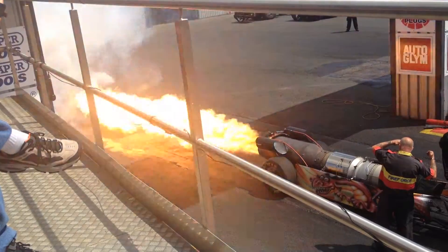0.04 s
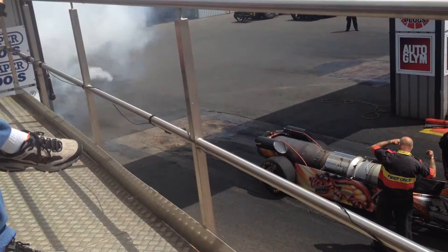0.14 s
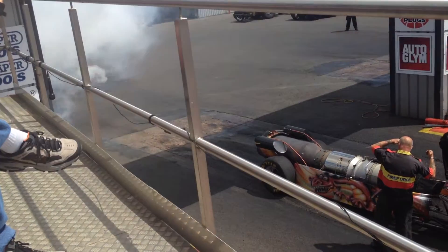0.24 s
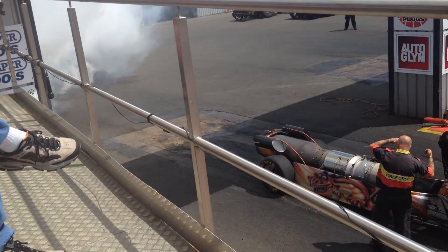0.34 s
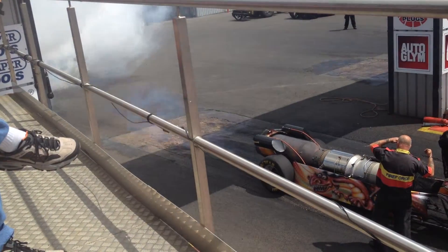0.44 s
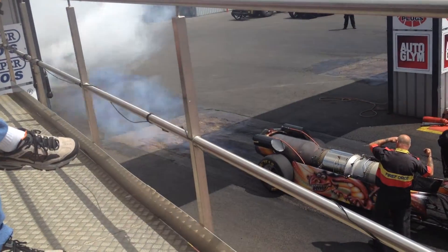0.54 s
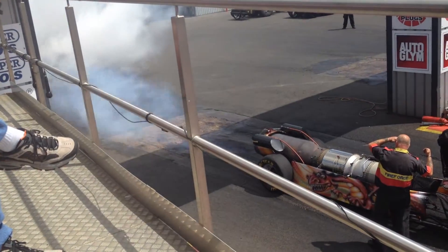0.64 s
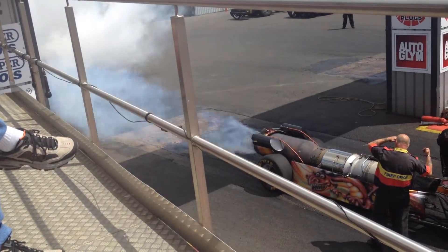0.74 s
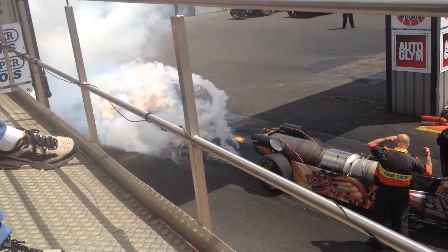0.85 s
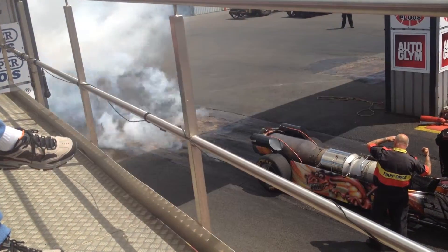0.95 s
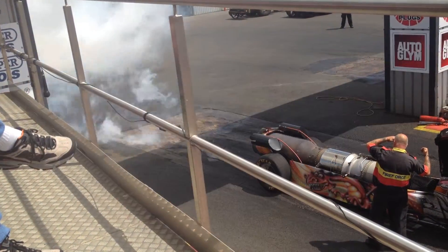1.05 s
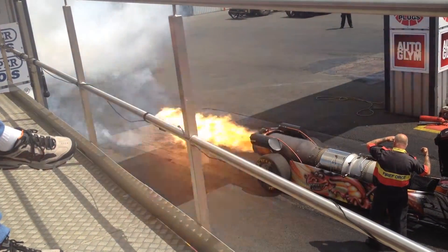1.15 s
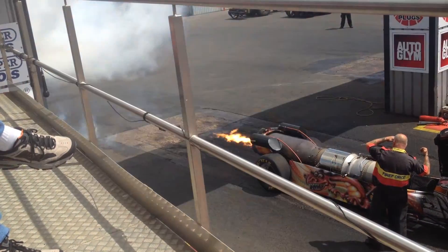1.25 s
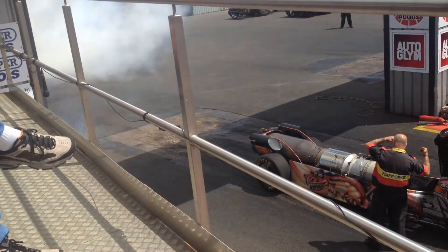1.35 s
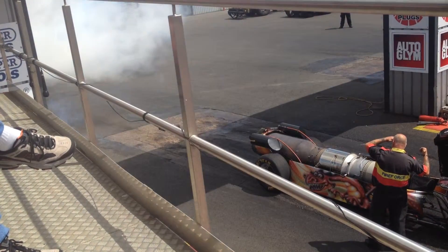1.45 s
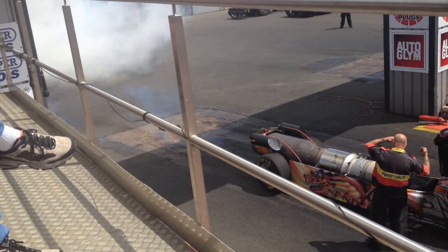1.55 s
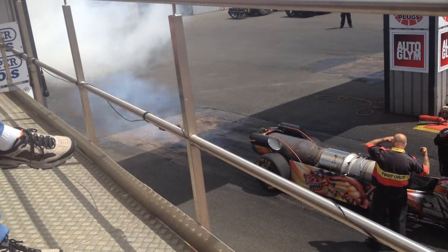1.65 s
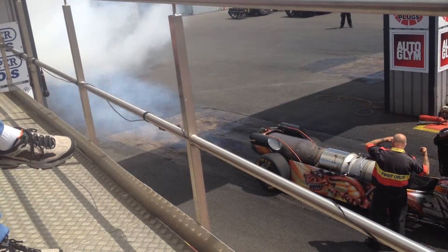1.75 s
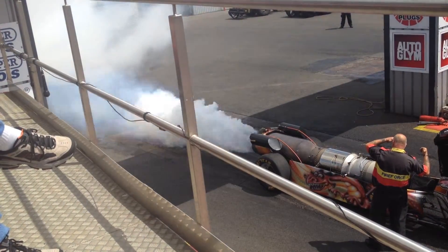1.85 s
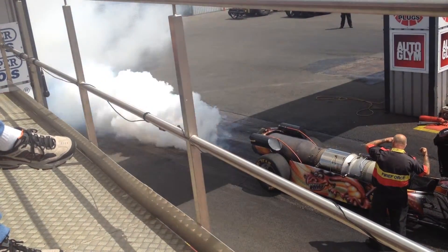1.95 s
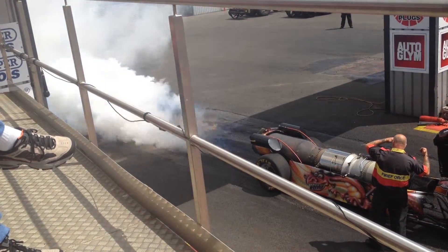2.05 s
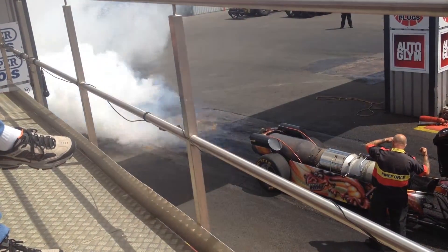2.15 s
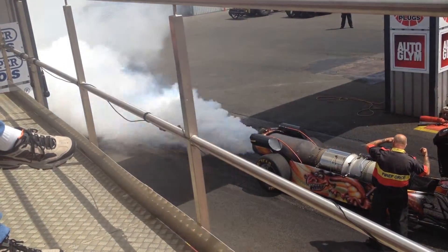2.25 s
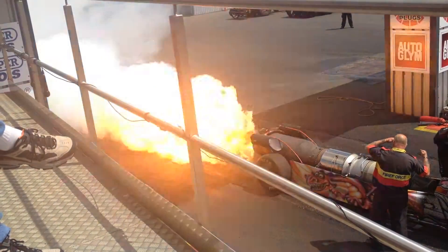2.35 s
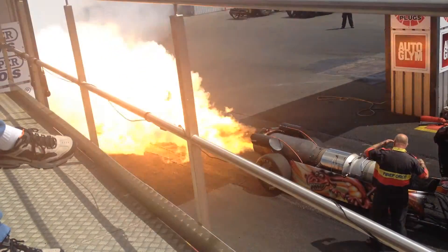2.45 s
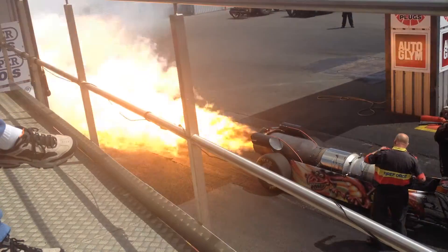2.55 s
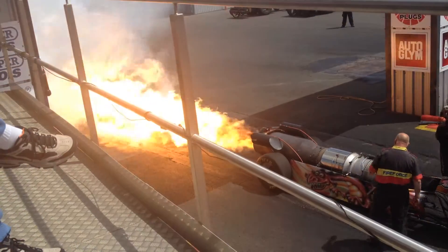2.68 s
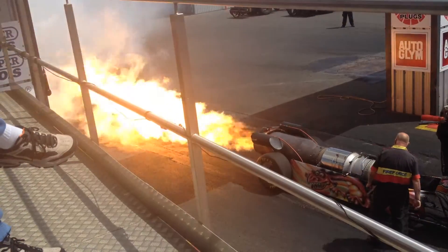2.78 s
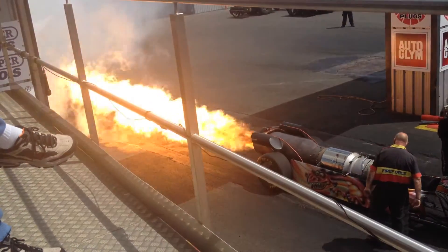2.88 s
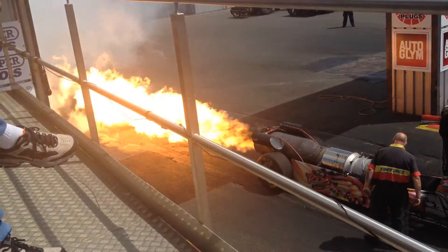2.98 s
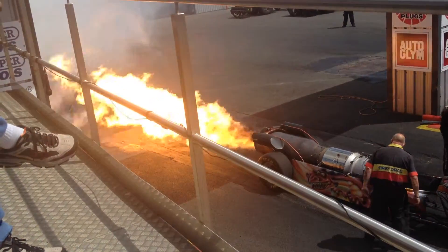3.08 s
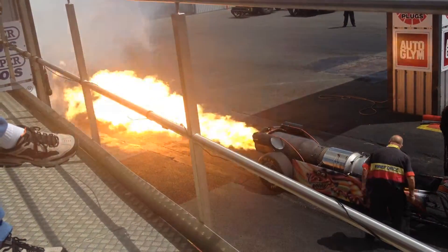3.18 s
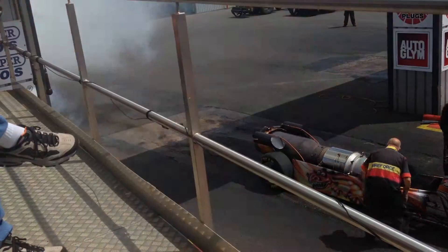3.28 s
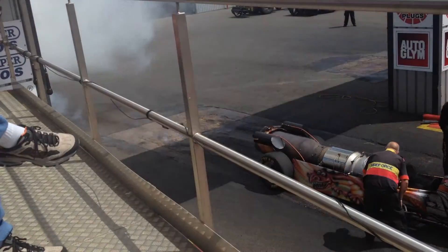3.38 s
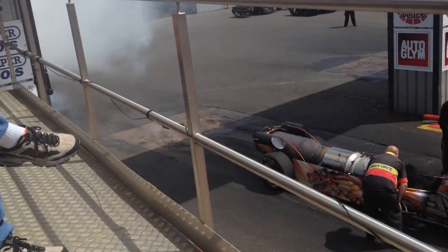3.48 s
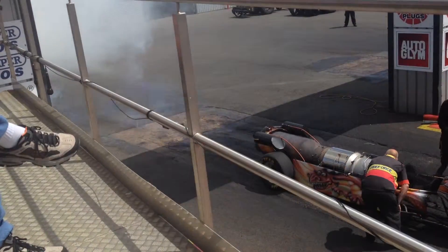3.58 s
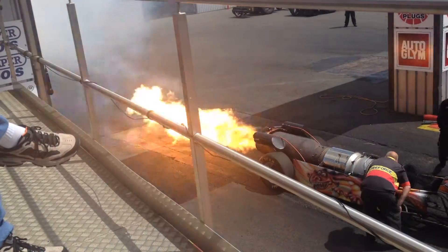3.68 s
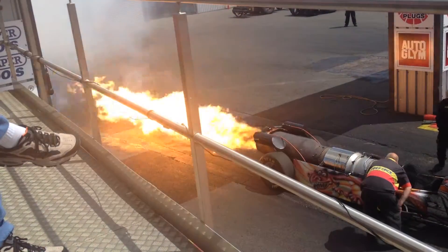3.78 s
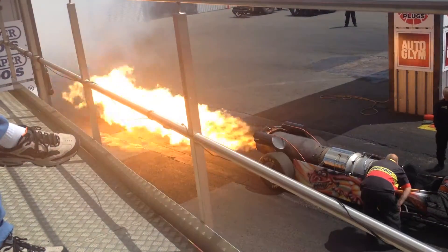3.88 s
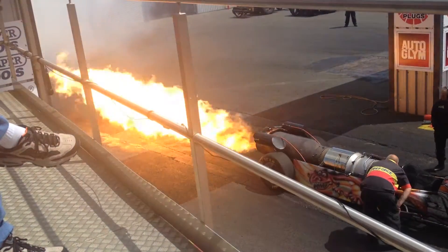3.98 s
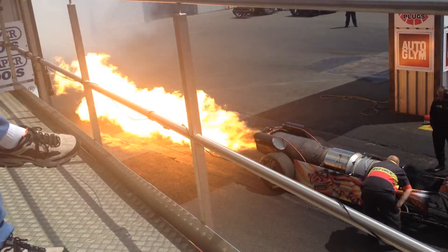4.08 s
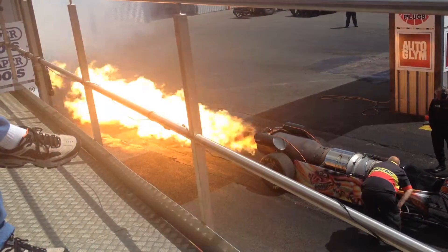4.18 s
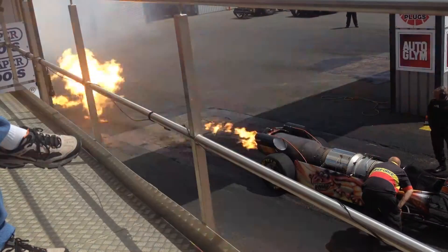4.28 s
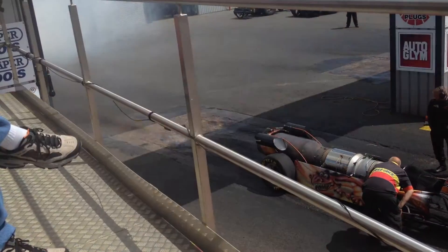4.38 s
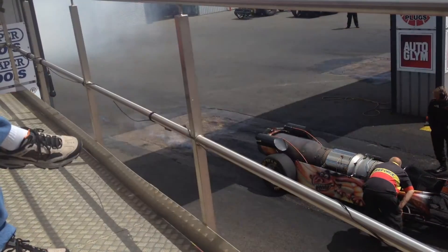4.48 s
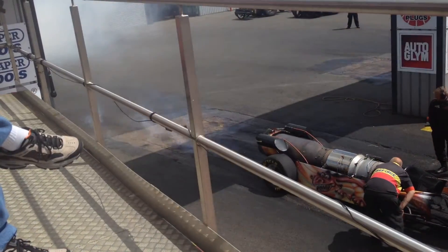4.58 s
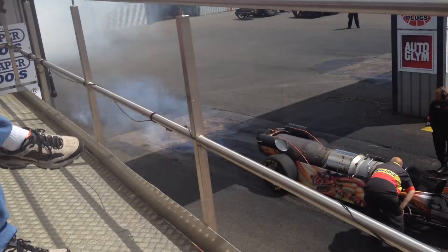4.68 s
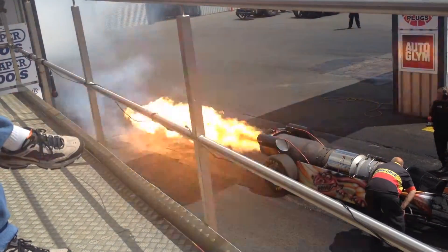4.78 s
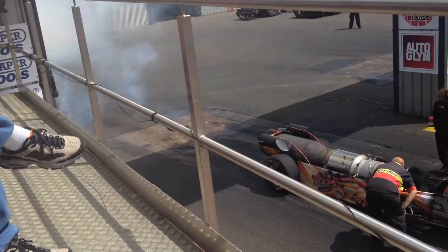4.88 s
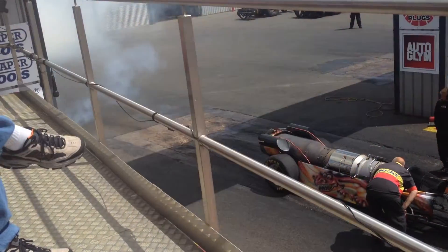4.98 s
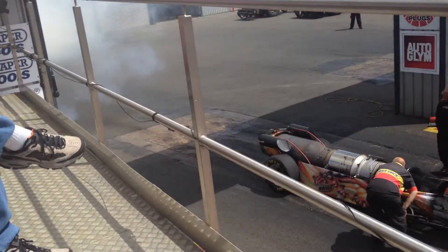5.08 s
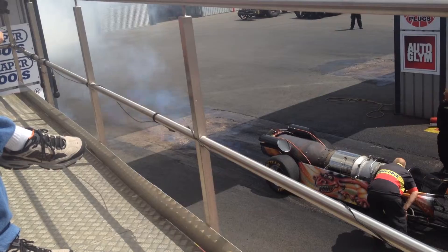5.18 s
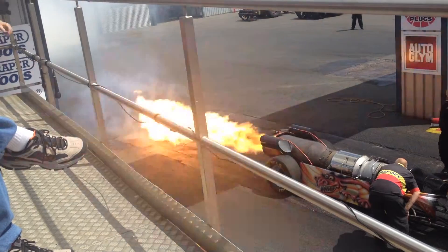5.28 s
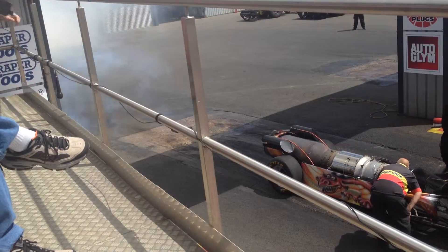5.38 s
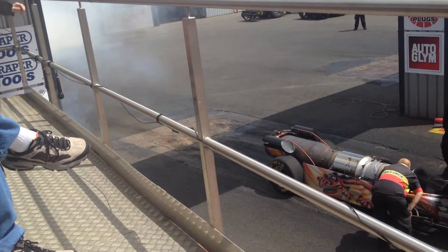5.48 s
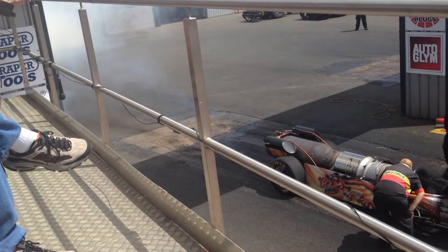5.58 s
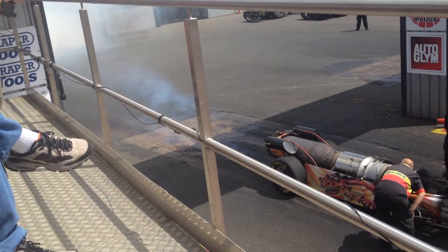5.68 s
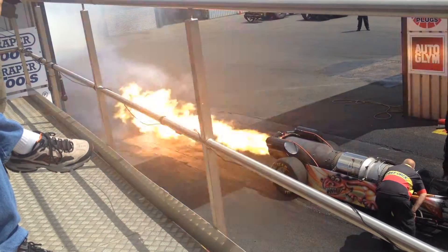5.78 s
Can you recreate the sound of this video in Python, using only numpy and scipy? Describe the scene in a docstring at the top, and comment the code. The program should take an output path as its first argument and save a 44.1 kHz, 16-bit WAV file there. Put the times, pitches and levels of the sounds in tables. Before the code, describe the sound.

Heard from a trackside stand through a single camera microphone: a continuous, slightly wavering turbine whine over rushing air. Afterburner flames ignite with low thumps and cracks, roar and tear raggedly, then stop abruptly, leaving the whine. Short pops come first, two long blasts in the middle, short bursts afterwards, and a fresh ignition right at the end. Loud peaks sound squashed.

```python
"""Start line of a drag strip, heard from a grandstand a few metres above the idling jet dragster, mono camera.
A burst of flame roars as the take opens, over whining compressor blades, a hoarse howl and intake hiss; short
bursts cluster near 1 s, long ones start near 2.4 and 3.7 s, short ones follow, and another lights at the very end.
Whine is tones at multiples of a written spool speed, air is coloured noise, flame is lumpy noise with shocks,
ignitions are low swings with a crack. The camera's limiter ducks the whole sound, whine included, at loud peaks."""
import sys
import numpy as np
from scipy.fft import rfft, irfft, next_fast_len
from scipy.io import wavfile
from scipy.ndimage import uniform_filter1d, minimum_filter1d, map_coordinates

SR = 44100
rng = np.random.default_rng(int(sys.argv[2]) if len(sys.argv) > 2 else 0)


def unload_audio(sound):
    """Save the sound as a 16-bit wav file, at the path given as the first command line argument."""
    columns = np.transpose(np.atleast_2d(sound))
    # keep every value between -1 and 1, then stretch to whole-number steps
    steps = np.round(np.clip(columns, -1, 1) * 32767)
    wavfile.write(sys.argv[1], SR, steps.astype(np.int16))


N = 257103

# Shaft speed of the engine: time_s, speed_turns_per_s
SHAFT_SPEED = [(0.0, 243.9), (0.21, 241.7), (0.69, 244.2), (1.23, 244.5), (1.35, 242.7), (1.56, 244.0),
               (2.43, 245.4), (3.0, 240.1), (3.39, 238.0), (3.72, 240.1), (4.11, 239.9), (4.44, 238.9),
               (4.83, 241.6), (4.98, 240.3), (5.16, 242.5), (5.34, 243.2), (5.46, 242.1), (5.82, 244.6)]

# Spectra of noise, relative levels, each noise then brought to rms 1: frequency_hz, density_db
# Intake and engine air, from the middle of the range to the top
RUSH_SPECTRUM = [(500, -43), (950, -6.5), (1130, 1), (1400, 1.5), (1750, 0), (1950, -2.5), (2200, 0),
                 (2550, 3.5), (3300, 3.5), (3750, -2), (4400, -5), (5400, -4.5), (7000, -10.5)]
HISS_SPECTRUM = [(4000, -46), (5300, -5), (6000, 3), (7100, 3.5), (7900, 1.5), (8600, -3.5), (9200, -12),
                 (10500, -44)]
FIZZ_SPECTRUM = [(7000, -2), (8800, 4), (9450, -43.5), (10100, 1), (11200, 10), (12100, 4), (12700, 4),
                 (15200, 4), (17000, 8.5)]
# Flame: low roar, tearing edge, crackling shocks
ROAR_SPECTRUM = [(15, -47), (28, -35), (68, -29.5), (108, -7), (138, -8), (160, -2.5), (200, 0.5),
                 (225, -3.5), (280, -0.5), (325, -6.5), (400, -11.5), (520, -17.5), (900, -39.5)]
TEAR_SPECTRUM = [(250, -41), (420, -3), (520, -1.5), (620, 4), (680, 1), (750, 3), (850, -3), (1050, -5.5),
                 (1400, -6), (2600, -10.5), (3400, -19), (4800, -28.5), (12000, -60)]
CRACKLE_SPECTRUM = [(600, -13), (1100, 1.5), (2100, 5), (3200, 5), (4800, 0), (12000, -30)]

# Hoarse tones of the howl, relative to each other: shaft_multiple, half_width_hz, level_db
HOWL_TONES = [(4.65, 70, -10.5), (5.45, 120, -7.5), (5.92, 7.5, -3), (6.2, 55, -4.5), (6.42, 24, 0.5),
              (6.68, 61, -3)]
# Howl against time, before HOWL_DB: time_s, level_db
HOWL_CURVE = [(0.0, -20), (0.6, -17.5), (0.78, -16.0), (1.05, -24), (1.11, -16.5), (1.41, -18.5),
              (2.46, -16.5), (3.06, -18.5), (3.15, -19.5), (3.6, -16), (4.14, -18.5), (5.37, -16.5),
              (5.67, -18), (5.82, -17.5)]
HOWL_DB, RUSH_DB, HISS_DB, FIZZ_DB = -3, -18, -19, -22.5

# Blade tones against time, before flutter: time_s, level_db
FRONT_CURVE = [(0.0, -26), (0.15, -26), (0.6, -19.5), (0.81, -26), (1.3, -23.5), (1.92, -19.5),
               (2.22, -24.5), (2.37, -19), (2.97, -26), (3.38, -19), (3.54, -29), (3.84, -26), (4.29, -30),
               (4.68, -21), (4.92, -26.5), (5.28, -15.5), (5.55, -15), (5.82, -24)]
FRONT_OCTAVE_CURVE = [(0.0, -17), (0.15, -33), (0.41, -13.5), (0.62, -39), (0.88, -17), (0.99, -33),
                      (1.22, -23), (1.56, -16), (1.74, -25), (2.67, -20), (2.94, -30), (3.15, -21),
                      (3.27, -33), (3.66, -23.5), (4.3, -25), (4.7, -27), (4.95, -30), (5.1, -21.5)]
REAR_CURVE = [(0.0, -33), (0.54, -23), (1.02, -25.5), (1.17, -23), (1.32, -39), (1.47, -25.0), (1.53, -25),
              (1.92, -19.5), (3.0, -27), (3.12, -16.5), (3.36, -28), (3.42, -23.0), (3.51, -26.5),
              (5.82, -30)]
FRONT_BLADES, REAR_BLADES = 12, 31
# Fainter overtones and sum tones: shaft_multiple
OVERTONE_ORDERS = (19, 33, 34, 36, 43, 45, 48, 55, 60)
# Their levels in the same order, before treble changes and wander: level_db
OVERTONE_LEVELS = (-47, -37.5, -48, -29, -34, -42, -34.5, -43, -50)
# Shared rise and fall of fizz and overtones; the compressor scales it: time_s, level_db
TREBLE_CURVE = [(0, -0.5), (0.76, -0.3), (1, -1.5), (1.16, 2), (1.4, 0), (1.72, -1), (2.16, 0), (2.44, 0),
                (3.4, 1), (3.68, 3), (4.32, -1.5), (4.68, 1.5), (5.2, -0.3), (5.82, 0.5)]

# Afterburner bursts, before guttering and echoes:
# start_s, flare_up_s, fuel_on_s, roar_db, tear_db, bang_db
BURSTS = [(0.0, 0.0068, 0.22, -10.5, -14, -20), (0.89, 0.018, 0.03, -16, -15, -28),
          (0.924, 0.0068, 0.017, -1.5, -7, 5), (0.975, 0.014, 0.038, -5.5, -20, -27),
          (1.235, 0.046, 0.1, -8.5, -12, -12), (2.443, 0.012, 0.865, -7, -11.5, 6),
          (3.738, 0.015, 0.64, -10, -15, -9), (4.836, 0.039, 0.12, -9, -11.5, -17),
          (5.347, 0.029, 0.078, -8.5, -9.5, -5), (5.814, 0.012, 0.1, -1, -7.5, -12)]
# A bang arrives directly, then off the track and the stand: delay_s, level_db
BANG_ARRIVALS = [(0, 3), (0.006, 6), (0.017, 2.5)]
ROAR_FADE_DB_PER_S, TEAR_FADE_DB_PER_S = 92, 120  # once the fuel is cut
IDLE_ROAR_DB, IDLE_TEAR_DB = -32, -28.5  # exhaust between bursts
GUST_DB, GUST_KNOTS_PER_S = 1.34, 16  # guttering of the flame

TOP_HZ = 15400  # the camera's band limit


def amp(db):
    """Decibels to amplitude."""
    return 10 ** (np.asarray(db) / 20)


def unit(x):
    """x brought to rms 1."""
    return x / np.sqrt(np.mean(x ** 2) + 1e-20)


def curves(rows):
    """One value per sample for each column after the time."""
    time_s, *columns = np.transpose(rows)
    return [np.interp(np.arange(N) / SR, time_s, column) for column in columns]


def wobble(knots_per_s):
    """A smooth random curve through normally distributed knots."""
    knots = rng.standard_normal(int(N * knots_per_s / SR) + 4)
    coarse = np.arange(0, N + 32, 32)  # the spline is read every 32 samples
    values = map_coordinates(knots, [coarse * knots_per_s / SR], mode="nearest")
    return np.interp(np.arange(N), coarse, values)


def filtered(x, response):
    """x with its spectrum multiplied by a response of frequency."""
    size = next_fast_len(N + 8192)
    hz = np.fft.rfftfreq(size, 1 / SR)
    return irfft(rfft(x, size) * response(hz), size)[:N]


def coloured(x, spectrum):
    """x shaped by a spectrum table, interpolated over log frequency, at rms 1."""
    points_hz, db = np.transpose(spectrum)
    return unit(filtered(x, lambda hz: amp(np.interp(np.log(hz + 1), np.log(points_hz), db))))


def noise(spectrum):
    """Coloured noise of rms 1."""
    return coloured(rng.standard_normal(N), spectrum)


def hoarse(phase, width_hz):
    """A tone of rms 1 smeared by turbulence into a narrow band; sidebands are halved at width_hz."""
    def drift():
        return filtered(rng.standard_normal(N), lambda hz: 1 / (1 + (hz / width_hz) ** 2))
    return unit(drift() * np.cos(phase) + drift() * np.sin(phase))


def blade_tone(phase, scatter, width_hz):
    """Passing blades give a clean line of rms 1, with a skirt scattered by the hot air."""
    line = np.sqrt(2) * np.sin(phase + rng.uniform(0, 2 * np.pi))
    return line + scatter * hoarse(phase, width_hz)


def airflow(shaft, surge_db=0.82):
    """Air rushing through the engine: a hoarse howl tied to the shaft, a fluttering rush and a surging hiss."""
    level_db, = curves(HOWL_CURVE)
    treble_db, = curves(TREBLE_CURVE)
    howl = np.zeros(N)
    for multiple, width_hz, db in HOWL_TONES:
        howl += amp(db + 1.76 * wobble(14)) * hoarse(multiple * shaft, width_hz)
    rush = amp(RUSH_DB) * noise(RUSH_SPECTRUM)
    hiss = amp(HISS_DB) * noise(HISS_SPECTRUM)
    fizz = amp(FIZZ_DB + treble_db) * noise(FIZZ_SPECTRUM)
    surge = amp(surge_db * wobble(6))
    flutter = amp(.35 * wobble(60))
    return amp(HOWL_DB + level_db) * unit(howl) + flutter * (rush + surge * (hiss + fizz))


def compressor(shaft, flutter_db=1.3, wander_db=3.5, treble_swing=1.3):
    """Two blade rows sound at blade count times shaft speed, with overtones and sum tones that swell and fade."""
    out = np.zeros(N)
    rows = (
        (FRONT_BLADES, FRONT_CURVE),
        (2 * FRONT_BLADES, FRONT_OCTAVE_CURVE),
        (REAR_BLADES, REAR_CURVE),
    )
    for order, curve in rows:
        level_db, = curves(curve)
        gain = amp(level_db + flutter_db * wobble(28))
        out += gain * blade_tone(order * shaft, scatter=0.26, width_hz=23)
    treble_db, = curves(TREBLE_CURVE)
    for order, db in zip(OVERTONE_ORDERS, OVERTONE_LEVELS):
        gain = amp(db + treble_swing * treble_db + wander_db * wobble(9))
        out += gain * blade_tone(order * shaft, scatter=0.73, width_hz=21)
    return out


def ignitions(thump_hz=150, life_s=0.0054, crack_db=-17, crack_life_s=0.0051):
    """Each time the fuel cloud catches, it cracks and shoves the air in a few low swings."""
    out = np.zeros(N)
    crack = noise(TEAR_SPECTRUM)
    for start_s, *_, bang_db in BURSTS:
        for delay_s, path_db in BANG_ARRIVALS:
            first = int(np.clip((start_s + delay_s) * SR, 0, N - 1))
            span = slice(first, min(first + SR // 10, N))
            t = np.arange(span.stop - first) / SR
            swell = t / life_s * np.exp(1 - t / life_s)  # peaks at life_s
            thump = .5 * swell * np.sin(2 * np.pi * thump_hz * t)
            snap = amp(crack_db) * np.exp(-t / crack_life_s) * crack[span]
            out[span] += amp(bang_db + path_db) * (thump + snap)
    return out


def burn(start_s, flare_s, fuel_on_s, fade_db_per_s):
    """Envelope of one burst: it flares up, holds while fuel flows and dies away."""
    t = np.maximum(np.arange(N) / SR - start_s, 0)
    flare = 1 - np.exp(-t / flare_s)
    return flare * amp(-fade_db_per_s * np.maximum(t - fuel_on_s, 0))


def flame():
    """Gains of roar and tearing: guttering bursts add their power to the idling exhaust."""
    roar_power = amp(IDLE_ROAR_DB) ** 2
    tear_power = amp(IDLE_TEAR_DB) ** 2
    gust = amp(GUST_DB * wobble(GUST_KNOTS_PER_S))
    for start_s, flare_s, fuel_on_s, roar_db, tear_db, _ in BURSTS:
        roar_burn = burn(start_s, flare_s, fuel_on_s, ROAR_FADE_DB_PER_S)
        tear_burn = burn(start_s, flare_s, fuel_on_s, TEAR_FADE_DB_PER_S)
        roar_power = roar_power + (amp(roar_db) * gust * roar_burn) ** 2
        tear_power = tear_power + (amp(tear_db) * gust * tear_burn) ** 2
    return np.sqrt(roar_power), np.sqrt(tear_power)


def afterburner(flicker_db=1.8, crackle_rate=380, steepening_db=6.0):
    """The flame roars in dense lumps; its pressure crests flatten and tear into small shocks."""
    roar_gain, tear_gain = flame()
    swing = unit(noise(ROAR_SPECTRUM) * amp(flicker_db * wobble(35)))
    roar = unit(np.tanh(.6 * swing))
    crest = amp(2.5 * np.clip(swing, -2, 2))  # tearing is strongest on the positive swings
    tear = coloured(crest * rng.standard_normal(N), TEAR_SPECTRUM)
    # crackle_rate is shocks per second where crest is 1
    struck = rng.random(N) < crackle_rate / SR * crest
    shocks = unit(struck * rng.standard_normal(N))
    # loud waves steepen, so the crackle grows with the square of the tearing gain
    crackle = tear_gain ** 2 * amp(steepening_db) * coloured(shocks, CRACKLE_SPECTRUM)
    return roar_gain * roar + tear_gain * tear + crackle


def scene():
    """Engine and flame heard at one point, the same signal on both channels."""
    speed, = curves(SHAFT_SPEED)
    shaft = 2 * np.pi * np.cumsum(speed + 0.0456 * wobble(18)) / SR  # shaft angle in radians
    mono = airflow(shaft) + compressor(shaft) + ignitions() + afterburner()
    return np.array([mono, mono])


def limiter(x, ceiling, recovery_db_per_s, ahead_s, ramp_s):
    """The gain drops quickly a little before each peak and climbs back at a steady rate in dB."""
    over_db = 20 * np.log10(np.maximum(np.abs(x).max(axis=0) / ceiling, 1))
    climb_db = recovery_db_per_s * np.arange(N) / SR
    # a running maximum on a rising slope leaves a cut that recovers steadily
    cut_db = np.maximum.accumulate(over_db + climb_db) - climb_db
    span = max(int(ahead_s * SR), 1)
    gain = minimum_filter1d(amp(-cut_db), span, origin=-(span // 2))  # looks ahead
    return x * uniform_filter1d(gain, max(int(ramp_s * SR), 1))


def record(dry):
    """The camera limits the level, rounds off the peaks that remain and keeps nothing above its band limit."""
    held = limiter(dry, ceiling=0.88, recovery_db_per_s=550, ahead_s=0.0059, ramp_s=.001)
    knee = 8  # higher is a sharper bend
    rounded = held / (1 + np.abs(held / .75) ** knee) ** (1 / knee)
    return np.array([filtered(side, lambda hz: hz < TOP_HZ) for side in rounded])


dry = scene()
out = record(dry)
unload_audio(out)
```